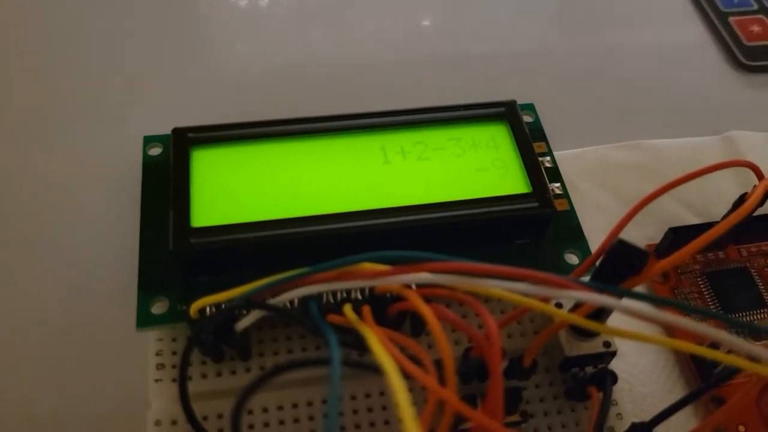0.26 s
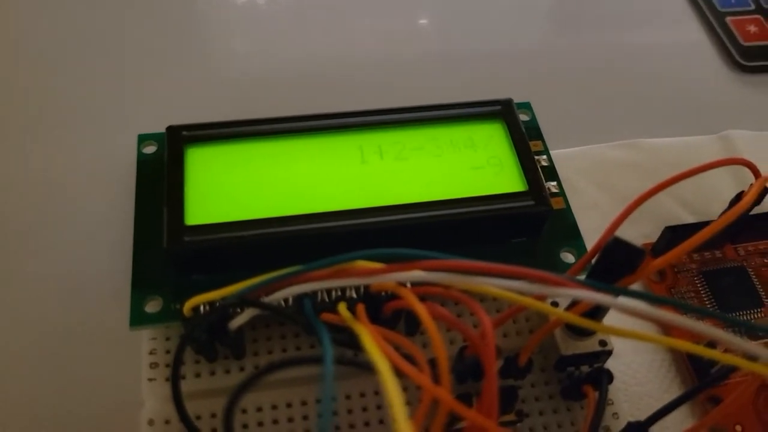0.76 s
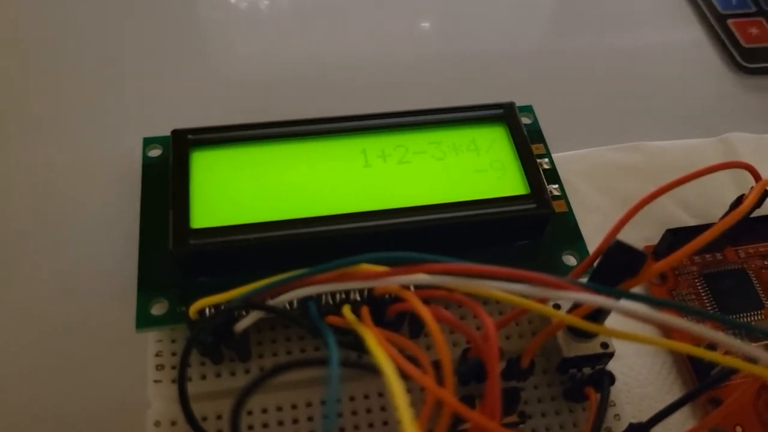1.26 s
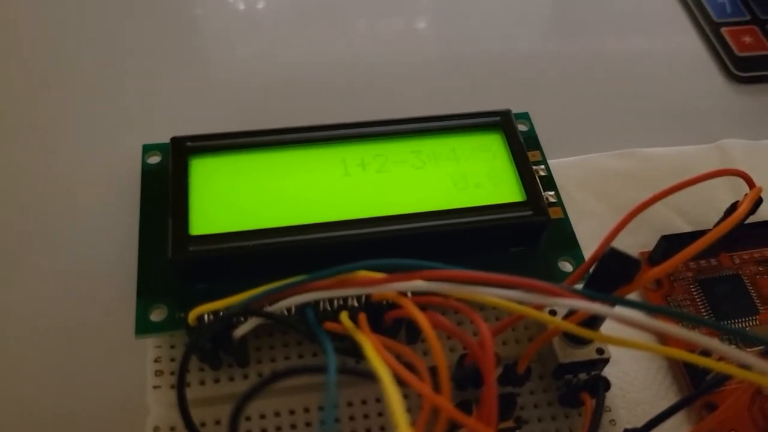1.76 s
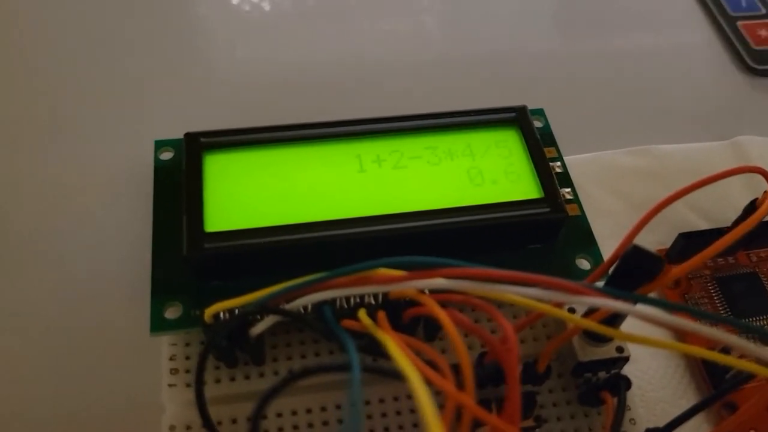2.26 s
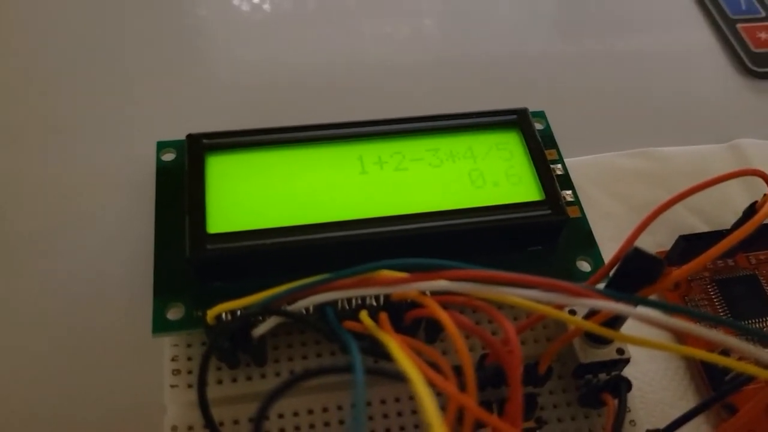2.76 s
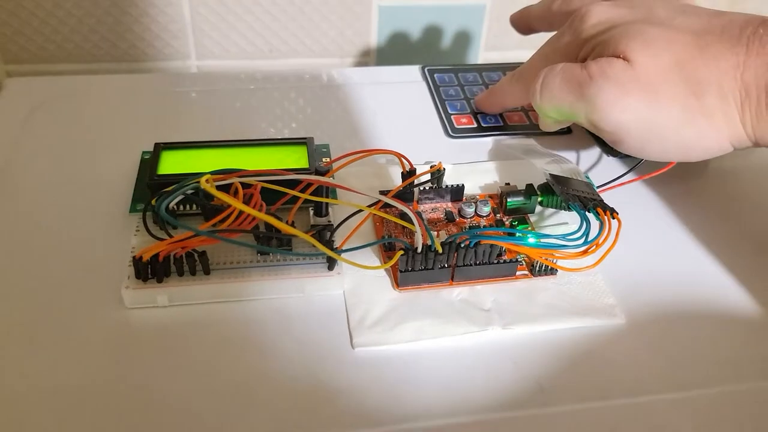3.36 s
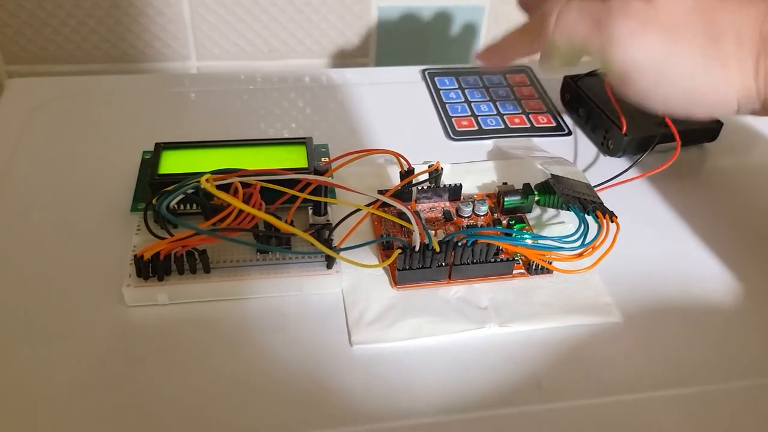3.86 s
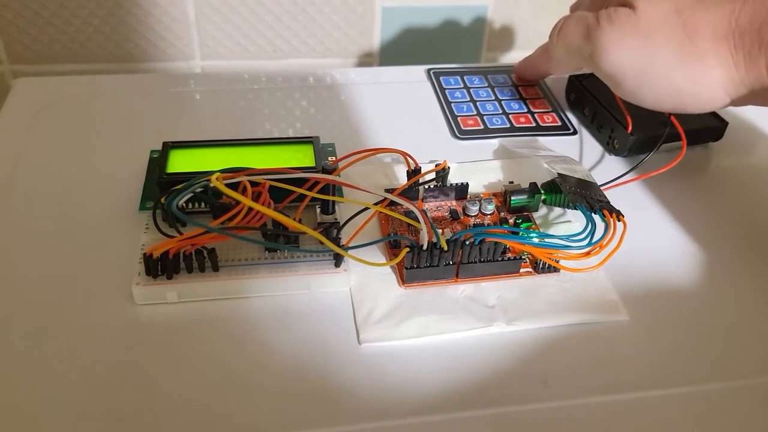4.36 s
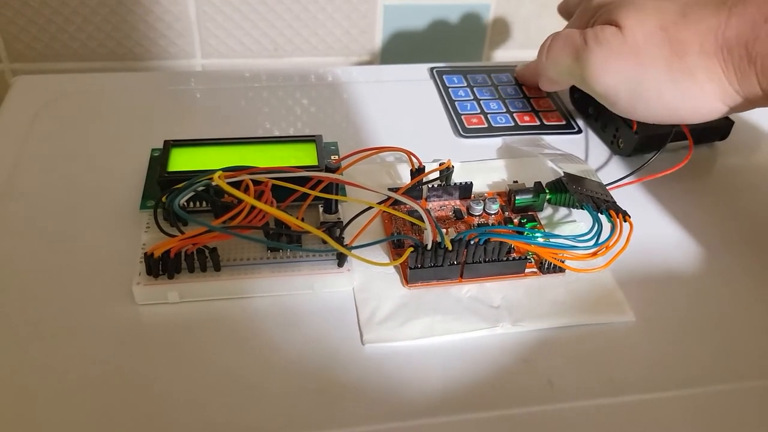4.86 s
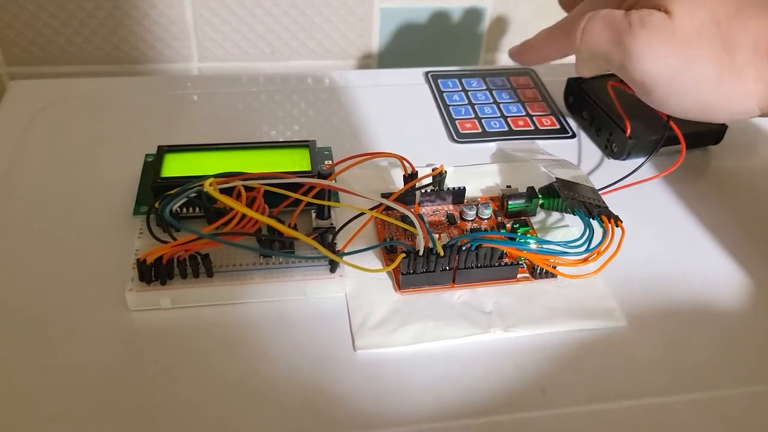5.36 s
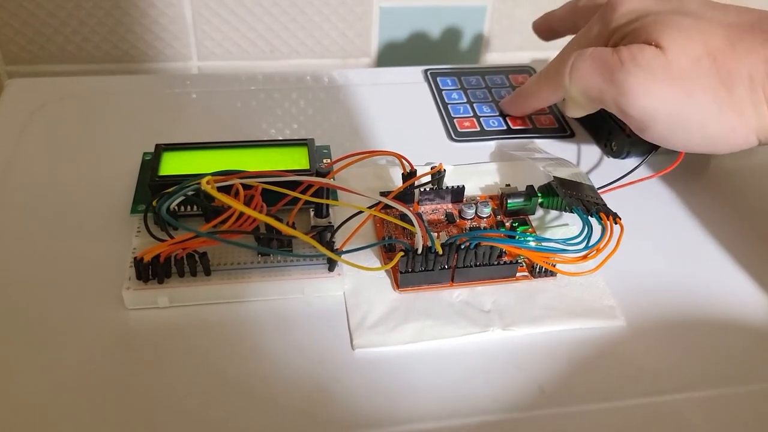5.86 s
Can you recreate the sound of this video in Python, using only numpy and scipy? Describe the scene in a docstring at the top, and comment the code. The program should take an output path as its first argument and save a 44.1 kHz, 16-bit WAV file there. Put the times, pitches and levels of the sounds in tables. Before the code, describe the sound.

A low, quiet motor hum with faint room air runs throughout, heard in a small room through a close stereo microphone. A fingertip presses a flat membrane keypad on a hollow table. At about 0.6 seconds come light plastic clicks and a soft thud, then a faint bump at 0.9. A click at 1.5 leads to a firmer knock at 1.6, with faint deep thuds around 2 seconds. Just after a click and soft thud at 3.1, the background abruptly becomes fuller as a fan's soft whir joins the hum and stays. A click at 3.4 is followed by a clear knock at 3.6, with a barely audible high whistle of squeezed air. A light click and weak tap come around 4.8. Another click at 5.9 precedes the sharpest, loudest tap at about 6.1 seconds. Each knock dies quickly, leaving a slight low boom.

```python
"""A fingertip works a flat membrane keypad lying on a hollow table top, close to a stereo microphone.
Light clicks of the cover foil and knocks or soft thuds of the table sound together or apart, built from
decaying modes and banded noise; deep booms join the thuds, skin ticks off the foil, squeezed air whistles.
A motor hums low in the small room: a steady tone, its octave, a wavering drone and a rumble.
Halfway the scene jumps to a later moment, when a fan (shaped noise and unsteady tones) is also running."""
import sys
import numpy as np
from scipy import signal
from scipy.fft import rfft, irfft, next_fast_len
from scipy.io import wavfile

SR = 44100
rng = np.random.default_rng(int(sys.argv[2]) if len(sys.argv) > 2 else 0)


def to_wav(s):
    """Save 16-bit WAV."""
    ch = np.atleast_2d(s).T  # columns
    pcm = np.round(np.clip(ch, -1, 1) * 32767)  # PCM
    wavfile.write(sys.argv[1], SR, pcm.astype(np.int16))


N = 269010  # samples
TIME = np.arange(N) / SR  # s
RING = np.arange(int(0.7 * SR)) / SR  # time since a hit [s]
LEFT_RIGHT = np.array([[1], [-1]])  # sign of a left-right difference at each port
JUMP_S = 3.161  # the scene jumps to the later moment
HUM_HZ = 49.3  # pitch of the motor, the drone and the booms

# The finger pushes on or leaves the table:
# (time [s], level [dB], contact cut-off [Hz], bass thump gain [dB])
KEY_PRESSES = [(.604, -45.5, 1480, -9), (.607, -34.5, 487, -0.5), (.904, -52.5, 393, 0),
               (1.6345, -27.5, 877, -1.5), (1.954, -61, 683, 10.5), (2.012, -53.5, 206, -2),
               (2.07, -67.5, 338, -8), (3.138, -44.5, 414, 2.5), (3.5511, -28, 1500, -5.5),
               (4.860, -50.5, 624, -1), (6.0611, -25, 1690, -3)]


def amp(db):
    """Level law: decibels to an amplitude gain."""
    return 10 ** (np.asarray(db) / 20)


def at(points, hz):
    """Logarithmic frequency scale: read (frequency [Hz], value) points between their entries."""
    f, value = np.transpose(points)
    return np.interp(np.log(np.maximum(hz, 1)), np.log(f), value)


def unit(x):
    """Energy normalisation: scale a hit to rms 1 over its first 36 ms."""
    onset = x[..., :int(0.036 * SR)]
    return x / np.sqrt(np.mean(onset ** 2))


def fade(t60):
    """Exponential damping: the amplitude falls by 60 dB in t60 seconds."""
    return np.exp(-np.log(1000) * RING / t60)


def butter(x, hz, kind, order):
    """Maximally flat filtering: a causal Butterworth filter."""
    sos = signal.butter(order, hz, kind, fs=SR, output="sos")
    return signal.sosfilt(sos, x)


def walk(rate):
    """Band-limited fluctuation: low-passed noise with spread 1, rate [Hz] setting its speed."""
    f = np.arange(N // 2 + 1) * SR / N
    spectrum = rfft(rng.standard_normal(N)) * np.exp(-(f / rate) ** 2)
    x = irfft(spectrum, N)
    return x / x.std()


def add(out, s, hit):
    """Superposition: mix a hit in at time s; whatever rings across the jump stops there."""
    start = int(s * SR)
    limit = int(JUMP_S * SR) if s < JUMP_S else N
    stop = min(start + hit.shape[1], limit)
    out[:, start:stop] += hit[:, :stop - start]


def hum():
    """Beating: a motor's shaft tone and octave against a narrow random drone, over a deep rumble."""
    tone_db, octave_db, drone_db, rumble_db = -67.5, -80, -68, -77.5  # rms levels
    drone_waver_hz = 5  # how fast the drone swells and sinks
    turn = 2 * np.pi * HUM_HZ * TIME
    tone = amp(tone_db) * np.sin(turn)
    octave = amp(octave_db) * np.sin(2 * turn + walk(2.5))
    shaft = np.sqrt(2) * (tone + octave)  # peak to rms
    drone = walk(drone_waver_hz) * np.sin(turn) + walk(drone_waver_hz) * np.cos(turn)
    rumble = butter(rng.standard_normal(N), [30, 75], "band", order=2)
    return shaft + amp(drone_db) * drone + amp(rumble_db) * rumble / rumble.std()


def air(colour, side_db):
    """Coherence of a sound field: mid and side noise, most alike at both ports near 150 Hz."""
    f = np.arange(N // 2 + 1) * SR / N
    mid, side = rfft(rng.standard_normal((2, N))) * amp(at(colour, f)) * np.sqrt(SR / 2)
    mid = irfft(mid, N)
    side = irfft(side * amp(at(side_db, f)), N)
    sway = amp(0.3 * walk(8))  # the level barely sways
    return (mid + LEFT_RIGHT * side) * sway


def still_air():
    """Background noise: broadband air of the quiet room, defined by its spectral density."""
    # Spectrum of the air: (frequency [Hz], density [dB per Hz])
    still_colour = [(35, -105), (75, -90), (110, -87.5), (155, -93), (215, -110), (265, -116), (330, -109),
                    (480, -111.5), (800, -121), (1200, -122.5), (2400, -124.5), (3400, -126), (4300, -140),
                    (9000, -155)]
    # Stereo width of the air: (frequency [Hz], side minus mid [dB])
    still_side = [(60, -3.5), (150, -15.5), (400, 4.5), (1000, 3), (10000, -3)]
    return air(still_colour, still_side)


def modes(table, scatter_db, rise_cycles, apart_hz=700):
    """Modal superposition: damped sines, reweighted per hit; higher ones reach the ports out of step."""
    out = 0
    for hz, db, t60 in table:
        size, skew = rng.standard_normal(2)
        lag = LEFT_RIGHT * min(hz / apart_hz, 1) * np.pi / 4 * (np.sign(skew) + skew / 10)
        swell = 1 - np.exp(-RING * hz / rise_cycles)
        tone = np.sin(2 * np.pi * hz * RING + lag + rng.uniform(0, 2 * np.pi))
        out = out + amp(db + scatter_db * size) * swell * fade(t60) * tone
    return unit(out)


def crowd(colour, early_t60, room_db, apart_hz=430, wall_s=0.0041, wall_db=-4,
          rise_cycles=1.0, contact_s=0.0011):
    """High modal density: noise bands that die fast, bounce off the wall, then linger in the room."""
    # Ring time of table and room: (frequency [Hz], t60 [s])
    room_t60 = [(100, .5), (300, 0.52), (800, 0.26), (2000, .23), (5000, 0.23), (14000, 0.08)]
    f = np.arange(len(RING) // 2 + 1) * SR / len(RING)
    mid, side = rfft(rng.standard_normal((2, len(RING))))
    ports = mid + LEFT_RIGHT * side * np.minimum(f / apart_hz, 1) ** 2
    ports = ports * amp(at(colour, f))
    out = 0
    for hz in 80 * 2 ** (np.arange(24) / 3):  # third octaves
        in_band = np.abs(np.log2(np.maximum(f, 1) / hz)) < 1 / 6
        band = irfft(ports * in_band, len(RING))
        # slow bending waves bring the lows late
        swell = 1 - np.exp(-RING / (contact_s + rise_cycles / hz))
        decay = np.hypot(fade(early_t60), amp(room_db) * fade(at(room_t60, hz)))
        band = band * swell * decay
        band = band + amp(wall_db) * np.roll(band, int(wall_s * SR), axis=1)
        # a wider band holds more energy at the same density
        out = out + unit(band) * amp(at(colour, hz)) * np.sqrt(hz)
    return unit(out)


def clicks():
    """Local resonance: the finger meets the stiff foil, and every spot on it has its own ring."""
    # The cover foil clicks: (time [s], level [dB], ring of that spot [Hz], ring gain [dB],
    # left minus right [dB], treble gain [dB])
    foil_clicks = [(0.574, -45.5, 1930, -4, 1, 2.5), (.656, -48, 2030, -3, 1.5, -12),
                   (1.479, -45.5, 1790, -3.5, 0.5, 2), (1.635, -44.5, 1884, 4, 2, -6),
                   (3.099, -42, 1920, -6, 2, 2), (3.3942, -44, 1280, 0, 0, 2.5),
                   (3.5522, -41.5, 2710, 9.5, 0.5, 2.5), (4.7828, -45.5, 1180, -1, 0, -1),
                   (5.9166, -45, 1250, 0, 1, 0), (6.061, -45, 2850, 15, 2.5, 8.5)]
    # Modes of the keypad sheet: (frequency [Hz], level [dB], t60 [s])
    foil_modes = [(420, -0.5, 0.13), (1032, -5.5, .15), (1158, 0, 0.073), (1333, -1, 0.18),
                  (1483, 0.5, 0.035), (1850, -11, 0.23), (2226, -19.5, .13)]
    # Crowded modes between these: (frequency [Hz], relative density [dB per Hz])
    foil_colour = [(100, -7.5), (280, -15), (450, -3), (720, -11), (1050, 3.5), (1500, -4.5), (2050, -6.5),
                   (2600, -14.5), (3300, -17), (4200, -25), (7500, -29.5), (10000, -36.5), (15500, -42)]
    treble_hz = 4000
    out = np.zeros((2, N))
    for s, db, ring_hz, ring_db, pan_db, treble_db in foil_clicks:
        foil = crowd(foil_colour, early_t60=0.06, room_db=-7)
        foil = foil + amp(-5.5) * modes(foil_modes, scatter_db=5.5, rise_cycles=0.88)
        b, a = signal.iirpeak(ring_hz, 4, fs=SR)
        foil = foil + amp(ring_db) * signal.lfilter(b, a, foil)
        low = butter(foil, treble_hz, "low", order=3)
        treble = butter(foil, treble_hz, "high", order=3)
        foil = unit(low + amp(treble_db) * treble)
        add(out, s, amp(db + LEFT_RIGHT * pan_db / 2) * foil)
    return out


def knocks():
    """Impact excitation: the finger drives the table; a softer contact wakes fewer high modes."""
    # Modes of the table top: (frequency [Hz], level [dB], t60 [s])
    table_modes = [(113, -3, .42), (148, 0, .22), (189, -8, .45), (268, -6, .11), (311, 1, .26),
                   (353, -11, .35), (411, -4, .19), (448, -6, .2), (490, -8, .2), (603, -8, .24),
                   (645, -9, .2), (687, -7, .17), (773, -8, .27), (870, -6, .15), (925, -6, .17),
                   (985, -20, .5), (1028, -4, .14), (1104, -7, .15), (1160, -6, .13), (1215, -6, .15),
                   (1285, -4, .11), (1495, -8, .13)]
    # Crowded modes between these: (frequency [Hz], relative density [dB per Hz])
    table_colour = [(80, -7), (120, -7.5), (220, -10.5), (330, 1.5), (550, 1.5), (900, 7), (1300, 7.5),
                    (2000, -18), (5000, -16.5)]
    bass_hz = 215
    out = np.zeros((2, N))
    for s, db, contact_hz, thump_db in KEY_PRESSES:
        top = modes(table_modes, scatter_db=1.5, rise_cycles=1.6)
        top = top + amp(2) * crowd(table_colour, early_t60=0.085, room_db=-5.5)
        # the weight of the hand behind the finger drives the lowest bending modes
        thump = amp(thump_db) * butter(top, bass_hz, "low", order=5)
        top = thump + butter(top, bass_hz, "high", order=5)
        add(out, s, amp(db) * unit(butter(top, contact_hz, "low", order=6)))
    return out


def booms():
    """Low resonance: each press wakes a deep boom at the hum's pitch, more so in a softer, longer push."""
    boom_db, boom_contact_hz = -14, 506  # gain on the press's bass thump at this contact cut-off
    rise_s, t60_s = 0.06, 0.9
    out = np.zeros((2, N))
    ring = (1 - np.exp(-RING / rise_s)) * fade(t60_s)
    for s, db, contact_hz, thump_db in KEY_PRESSES:
        tone = np.sin(2 * np.pi * HUM_HZ * RING + rng.uniform(0, 2 * np.pi))
        gain = amp(db + thump_db + boom_db) * boom_contact_hz / contact_hz
        add(out, s, gain * (ring * tone)[None])
    return out


def whistle():
    """Flow-dependent pitch: air squeezed from under a key sings two thin tones that glide with the flow."""
    # Faint whistles: (start [s], length [s], time of the strongest flow [s], pitch then [Hz],
    # share of the pitch lost as the flow dies [0-1], level [dB])
    whistles = [(.705, 0.054, .73, 9600, .22, -87.5), (3.543, .19, 3.605, 11700, 0.19, -79),
                (3.812, .14, 3.84, 8560, .08, -86.5), (3.995, 0.073, 4.035, 8350, .12, -93)]
    flow_half_s = 0.035  # the flow halves this long before and after its peak
    lower_tone_ratio = 0.83  # pitch of the lower tone against the upper
    out = np.zeros((2, N))
    waver = 1 + 0.012 * walk(700)  # of pitch
    flicker = amp(3 * walk(70))  # of level
    for s, length, peak_s, hz, sag, db in whistles:
        flow = 1 / (1 + ((TIME - peak_s) / flow_half_s) ** 2)
        pitch = hz * (1 - sag * (1 - flow)) * waver
        phase = 2 * np.pi * np.cumsum(pitch) / SR
        swell = np.sin(np.pi * np.clip((TIME - s) / length, 0, 1))
        upper = np.sin(phase + LEFT_RIGHT)
        lower = np.sin(lower_tone_ratio * phase - LEFT_RIGHT)
        out += amp(db) * swell * flicker * (upper + lower)
    return out


def peels():
    """Adhesion release: tiny bright ticks of fast-dying noise as skin lets go of the foil."""
    # Skin peels off the foil: (time [s], level [dB])
    skin_peels = [(0.959, -82), (2.066, -82), (3.282, -77), (3.842, -82), (3.89, -79)]
    # Spectrum of a tick: (frequency [Hz], relative density [dB per Hz])
    peel_colour = [(1000, -29), (4000, -10.5), (7200, -4), (11000, -23), (15500, 0)]
    out = np.zeros((2, N))
    for s, db in skin_peels:
        add(out, s, amp(db) * crowd(peel_colour, early_t60=0.035, room_db=-14))
    return out


def fan():
    """Broadband and tonal flow noise: rushing air with tones unsteady in level and phase."""
    # Spectrum of the room air with the fan: (frequency [Hz], density [dB per Hz])
    fan_colour = [(35, -102), (75, -84.5), (135, -82.5), (210, -93), (380, -90), (560, -98), (720, -99),
                  (890, -105), (1070, -102), (1300, -113), (1900, -117), (2700, -127), (3400, -127),
                  (5000, -150)]
    # Stereo width of this air: (frequency [Hz], side minus mid [dB])
    fan_side = [(60, -5), (150, -14.5), (300, -5.5), (600, 4.5), (1100, 3), (2000, 2), (10000, 2.5)]
    # Tones of the running fan: (frequency [Hz], level [dB])
    fan_tones = [(148, -68.5), (504, -69), (660, -69), (715, -76), (773, -78), (1075, -74.5)]
    tones = 0
    for hz, db in fan_tones:
        port_phase = rng.uniform(-1.95, 1, (2, 1)) * min(hz / 300, np.pi)
        phase = 2 * np.pi * hz * TIME + 2.47 * walk(3.5) + port_phase
        tones = tones + amp(db) * (1 + 0.59 * walk(18)) * np.sin(phase)
    return air(fan_colour, fan_side) + tones


def scene():
    """Linear superposition: keypad sounds over the hum, still air first and the fan after the jump."""
    room = np.where(TIME < JUMP_S, still_air(), fan())
    return hum() + room + clicks() + knocks() + booms() + whistle() + peels()


def record(dry):
    """Transducer response: the ports differ in colour and add their own hiss; a low-pass cuts the top."""
    # Colour of the left port against the right: (frequency [Hz], left minus right [dB])
    port_tilt = [(60, -1), (170, 0), (310, -3.5), (450, -1.5), (700, 2.5), (1100, 3), (2000, .5),
                 (8000, -.5)]
    # Microphone self-noise: (frequency [Hz], density [dB per Hz])
    hiss_colour = [(3000, -130), (5300, -132), (5900, -125), (7500, -131), (9500, -138), (11500, -135),
                   (13500, -129), (15500, -129)]
    top_hz = 15750
    size = next_fast_len(N + SR // 4)
    f = np.arange(size // 2 + 1) * SR / size
    ports = irfft(rfft(dry, size) * amp(LEFT_RIGHT * at(port_tilt, f) / 2), size)
    noise = rfft(rng.standard_normal((2, size)))
    hiss = irfft(noise * amp(at(hiss_colour, f)) * np.sqrt(SR / 2), size)
    low_pass = signal.ellip(8, 0.2, 70, top_hz, fs=SR, output="sos")
    return signal.sosfilt(low_pass, (ports + hiss)[:, :N])


dry = scene()
out = record(dry)
to_wav(out)
```